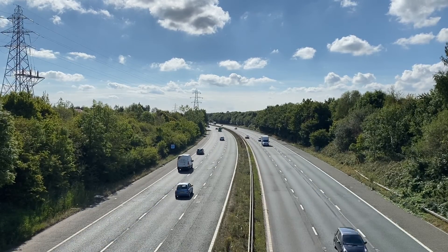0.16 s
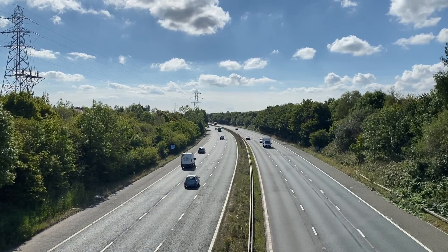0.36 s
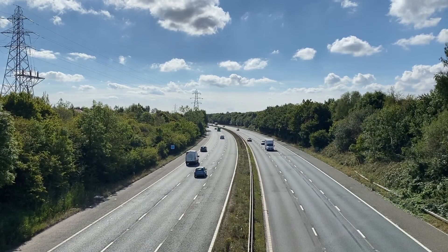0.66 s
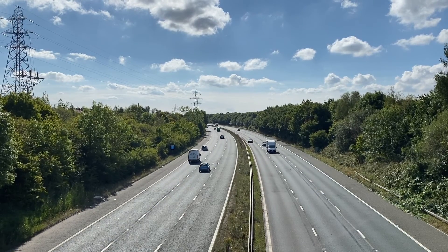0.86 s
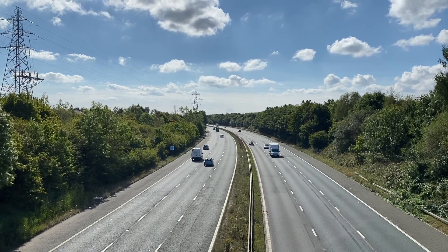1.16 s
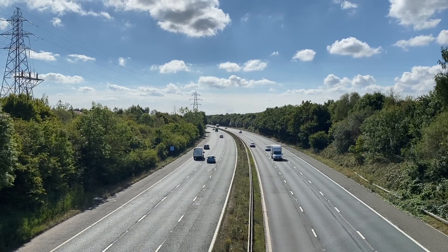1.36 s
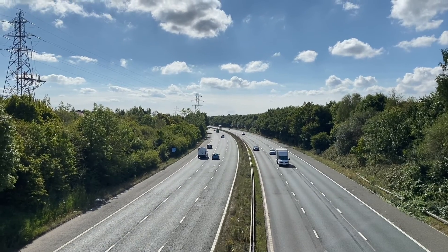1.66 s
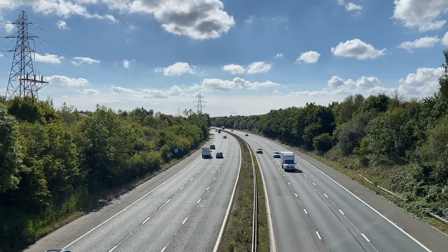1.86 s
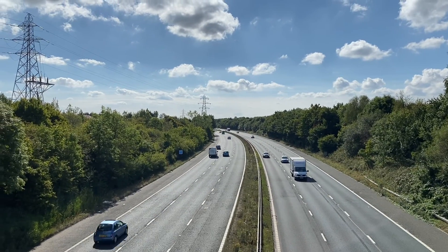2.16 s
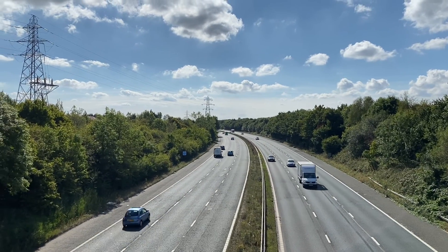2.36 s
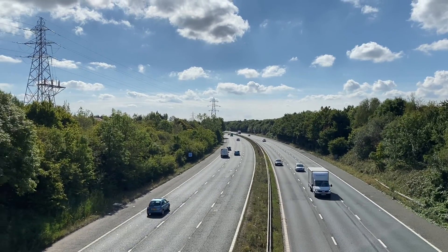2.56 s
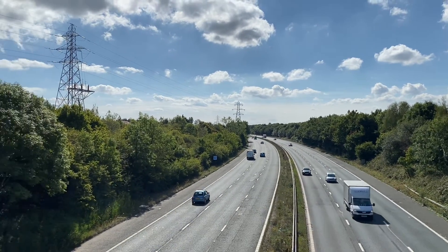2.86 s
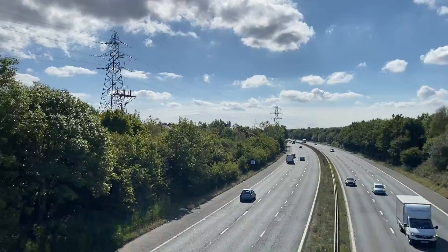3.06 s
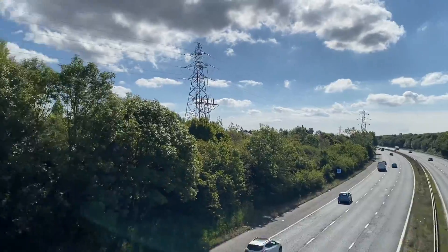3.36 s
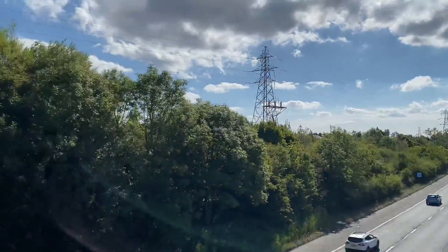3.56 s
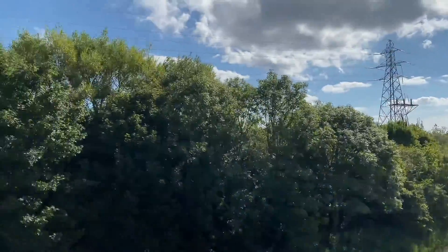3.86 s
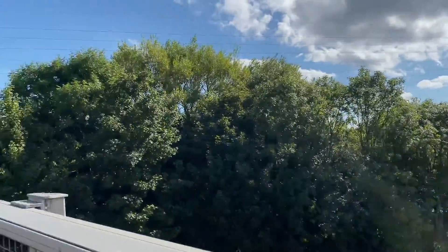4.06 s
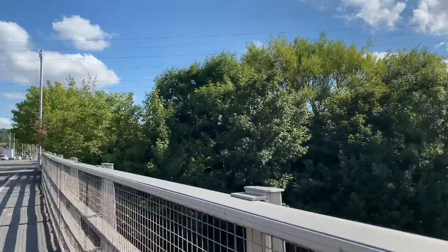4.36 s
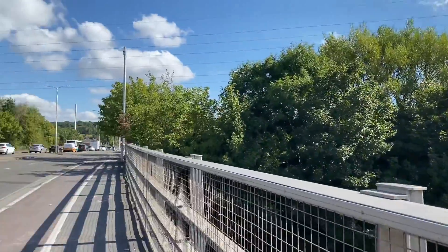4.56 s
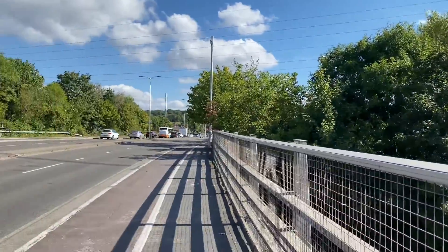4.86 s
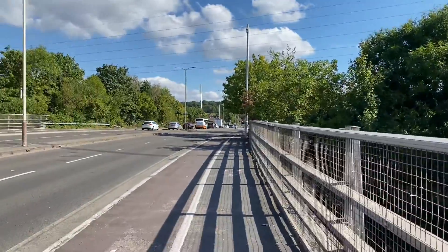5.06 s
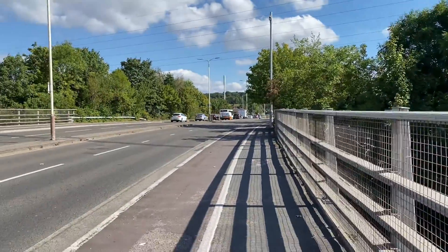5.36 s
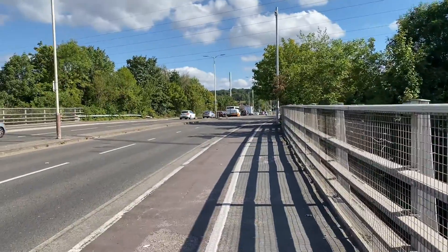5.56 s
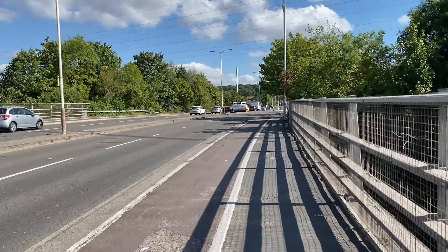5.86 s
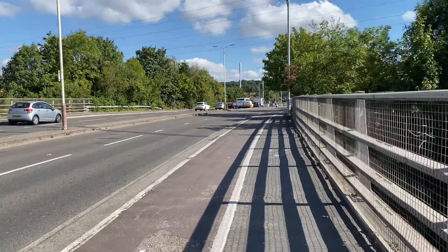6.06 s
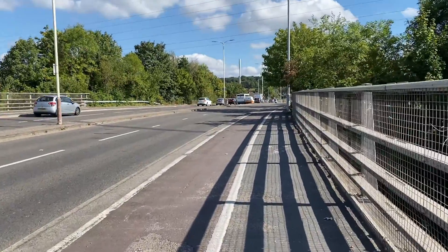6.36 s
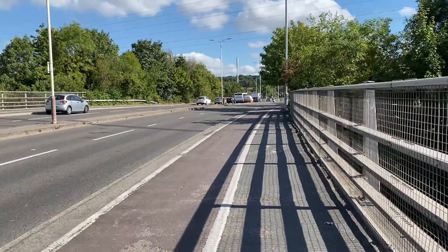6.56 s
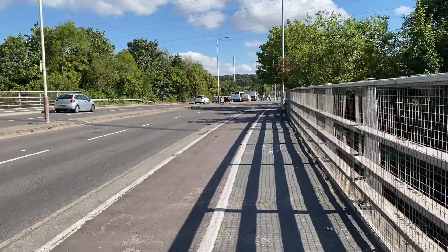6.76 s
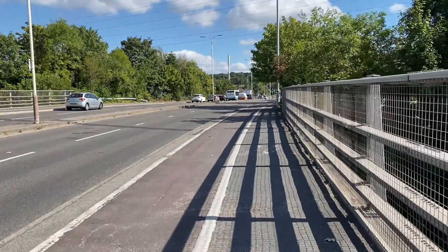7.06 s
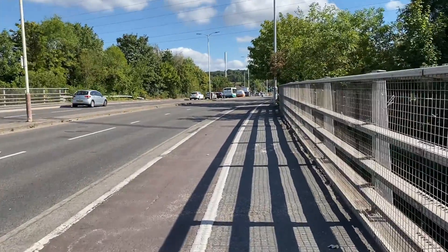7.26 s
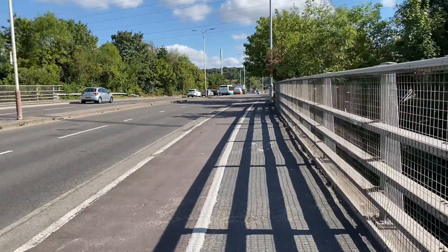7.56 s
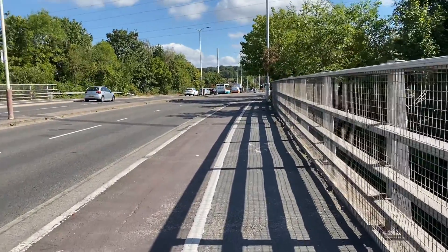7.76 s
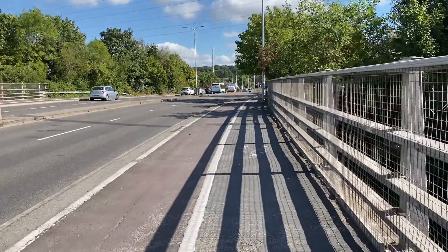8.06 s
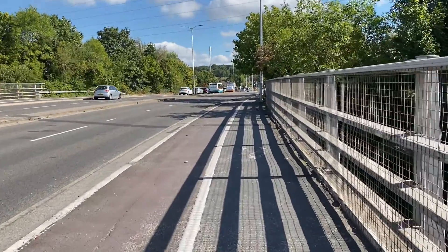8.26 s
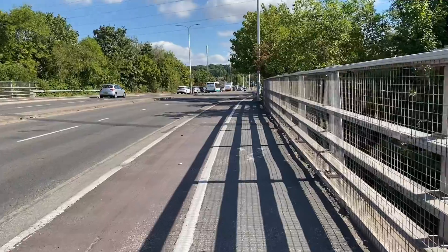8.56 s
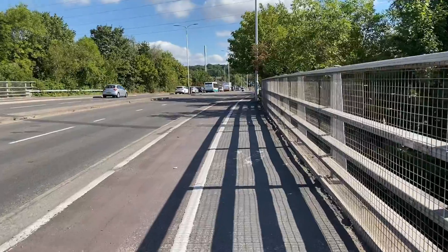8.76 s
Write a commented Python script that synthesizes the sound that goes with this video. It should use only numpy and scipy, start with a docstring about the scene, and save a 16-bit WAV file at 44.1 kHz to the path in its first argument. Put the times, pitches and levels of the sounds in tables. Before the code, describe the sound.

Fast traffic rushes under a bridge in overlapping whooshes over low engine rumble; the roar shifts rightward midway and soft wind buffets appear.

```python
"""Motorway from a bridge

On a bridge above a motorway, two microphone ports turn from the road to the deck, facing then behind the parapet.
Tyre roar is banded noise near 1 kHz that slides with each vehicle, over low-passed engine rumble and drone.
Cars burst from under the deck as sudden bright hiss; gliding bands of noise make single tyre notes.
Soft swishes and ticks are short noise bursts; a light wind thumps on the ports as brief low pulses.
"""
import sys
import numpy as np
from scipy import signal
from scipy.fft import rfft, irfft, next_fast_len
from scipy.io import wavfile
from scipy.ndimage import map_coordinates

SR = 44100
rng = np.random.default_rng(int(sys.argv[2]) if len(sys.argv) > 2 else 0)


def waveform_to_disk(signal):
    """Save audio, clipped to [-1, 1], as 16-bit WAV at the path in sys.argv[1]."""
    frames = np.transpose(np.atleast_2d(signal))
    scaled = np.clip(frames, -1, 1) * 32767
    samples = np.round(scaled).astype(np.int16)
    wavfile.write(sys.argv[1], SR, samples)


N = 393810
TIME = np.arange(N) / SR   # s
SIZE = next_fast_len(N)
HZ = np.maximum(np.arange(SIZE // 2 + 1) * SR / SIZE, 1)   # pitch of each bin; the log axis needs 1 or more

# In all that follows a positive lag means the left port hears later, a positive tilt that it hears louder.
LAG_FACING_MS, LAG_AWAY_MS = -0.35, 0.26
TILT_FACING_DB, TILT_AWAY_DB = 1.5, -8
LAG_MS_PER_DB = 0.33   # lag added with each dB of a vehicle's own tilt
BELOW_S, BELOW_LAG_MS = 0.99, 0.24   # the first cars are straight below: extra lag, halved by this time


def motorway():
    """Traffic on one bearing, which swings from ahead to the right as the ports turn."""
    swing = turning()
    levels_db, pitch_hz, side_db = traffic(swing)
    rumble_db, drone_db, roar_db, hiss_db, fizz_db = levels_db
    tilt_db = TILT_FACING_DB + swing * (TILT_AWAY_DB - TILT_FACING_DB) + side_db
    lag_ms = LAG_FACING_MS + swing * (LAG_AWAY_MS - LAG_FACING_MS) + LAG_MS_PER_DB * side_db
    lag_ms = lag_ms + BELOW_LAG_MS / (1 + (TIME / BELOW_S) ** 4)
    to_right = np.clip(lag_ms / 0.3, 0, 1)   # how far the road lies to the right
    out = tyre_roar(roar_db, pitch_hz, lag_ms, tilt_db, to_right)
    out += road_hiss(hiss_db, to_right)
    out += tyre_notes(lag_ms)
    out += emerging_cars()
    out += engine_drone(drone_db, lag_ms, tilt_db, to_right)
    out += engine_rumble(rumble_db, lag_ms, to_right)
    return out + fizz(fizz_db)


TURN_MID_S, TURN_S = 3.985, 0.49   # middle of the turn, and its time constant


def turning():
    """The ports swing smoothly from 0, facing the road, to 1, along the deck."""
    return .5 + .5 * np.tanh((TIME - TURN_MID_S) / TURN_S)


# Vehicles heard singly, with levels at their nearest [nearest_s, approach_s, departure_s,
# rumble_db, drone_db, roar_db, hiss_db, fizz_db, roar_pitch_hz (steers the roar), extra tilt_db]
VEHICLES = [(.44, 0.4, 0.16, -29, -30.5, -22.5, -32.5, -45.5, 1036, 0),
            (.75, 0.2, 0.15, -37, -27.5, -28.5, -36.5, -69, 806, 2),
            (1.4, 0.31, 0.19, -34, -32.5, -25.5, -40, -55.5, 836, -0.5),
            (1.98, 0.52, 0.49, -40.5, -32.5, -31, -36, -58, 1040, 1.5),
            (2.5, 0.13, 0.27, -44, -41, -20, -38.5, -56.5, 892, 0),
            (2.9, 0.24, 1, -34, -31, -25.5, -36.5, -63, 990, 1),
            (3.68, 0.23, 0.31, -33, -27.5, -25.5, -38, -51.5, 793, 2),
            (4.05, 0.21, 0.18, -30, -21.5, -22, -32.5, -60, 910, 1),
            (4.45, 0.5, 0.23, -26.5, -46, -26.5, -42, -72, 1080, 0.5),
            (4.95, 0.31, 0.23, -32.5, -35.5, -23.5, -38.5, -60.5, 1084, 0.5),
            (5.38, 0.18, 0.3, -36.5, -33, -31, -42.5, -72, 1024, 5),
            (6.1, 0.18, 0.25, -32.5, -40, -29.5, -50, -69, 970, 2),
            (6.8, 0.11, 0.34, -40, -36.5, -30, -45, -65, 836, 0),
            (7.25, 0.18, 0.25, -30, -32.5, -26.5, -55, -61.5, 964, 0),
            (7.82, 0.28, 0.2, -38, -42.5, -31.5, -46.5, -67, 940, 0),
            (8.55, 0.57, 0.38, -34.5, -41.5, -25.5, -51, -73.5, 950, 1.5)]
# Distant flow under them, facing the road and then behind the parapet
# [rumble_db, drone_db, roar_db, hiss_db, fizz_db]
FLOW_FACING, FLOW_AWAY = (-37, -34, -27, -43, -80), (-37, -35.5, -29.5, -42, -70.5)
FLOW_PITCH_HZ = 960
FALL_POWER = 1.474   # far off, power falls as distance to twice this power


def traffic(swing):
    """Each vehicle adds power to the flow as it nears; its share of the roar pulls pitch and side its way."""
    s, approach, departure, *levels_db, pitch_hz, side_db = np.transpose(VEHICLES)[:, :, None]
    distance = (TIME - s) / np.where(TIME < s, approach, departure)
    near = (1 + distance ** 2) ** -FALL_POWER
    flow = [from_db(2 * (a + swing * (b - a))) for a, b in zip(FLOW_FACING, FLOW_AWAY)]   # power
    single = [from_db(2 * db) * near for db in levels_db]
    total = [f + v.sum(axis=0) for f, v in zip(flow, single)]
    roar_share = single[2] / total[2]
    road_pitch_hz = FLOW_PITCH_HZ + (roar_share * (pitch_hz - FLOW_PITCH_HZ)).sum(axis=0)
    return 10 * np.log10(total), road_pitch_hz, (roar_share * side_db).sum(axis=0)


# Shape of the tyre roar [pitch_hz, relative level_db]
ROAR = [(250, -26.5), (450, -16), (650, -6), (820, -0.5), (1000, 0), (1200, -0.5), (1550, -9.5),
        (1750, -10), (2000, -26.5), (3000, -65.5)]
# How much of the roar's left-right tilt each pitch takes [pitch_hz, share 0-1]
SHADOW = [(500, 1), (1000, 0.84), (1600, 0.58)]


def tyre_roar(level_db, pitch_hz, lag_ms, tilt_db, to_right):
    """Third-octave noise bands whose gains follow the roar's shape as it slides with speed and angle."""
    white = scattered(arriving(lag_ms, .95 - 0.24 * to_right, order=1), to_right)
    spectrum, roar = rfft(white, SIZE), 0
    slide = (1000 / pitch_hz) ** 1.23   # the power widens the slide
    for hz in 315 * 2 ** (np.arange(11) / 3):
        band = np.maximum(1 - abs(3 * np.log2(HZ / hz)), 0)
        gain = from_db(at_hz(ROAR, hz * slide) + 1.5 * drift(10.0))
        tilt = sides(at_hz(SHADOW, hz) * tilt_db)
        roar = roar + gain * tilt * irfft(spectrum * band, SIZE)[:, :N]
    return from_db(level_db) * rms_one(roar)


# Share of the arriving roar not swapped for each port's own noise
# [pitch_hz, facing the road 0-1, turned away 0-1]
ROAR_LIKENESS = [(350, 0.6, 0.05), (553, 0.97, 0.4), (884, 0.78, 0.68), (1210, 0.55, 0.8), (1600, 0.55, .9),
                 (2300, 0.5, .8)]


def scattered(white, to_right):
    """Scatter swaps part of each pitch for noise of each port's own, by how far right the road lies."""
    left, right = rfft(white, SIZE)
    own = rfft(rng.standard_normal((2, N)), SIZE)
    hz, *shares = np.transpose(ROAR_LIKENESS)
    views = []
    for share, bend in zip(shares, case_turn(HZ)):
        alike = np.clip(at_hz(np.transpose([hz, share]), HZ), 0, 1)
        mixed = np.sqrt(alike) * np.array([left * bend, right]) + np.sqrt(1 - alike) * own
        views.append(irfft(mixed, SIZE)[:, :N])
    facing, away = views
    return (1 - to_right) * facing + to_right * away


# The microphone case bends the roar's path: phase the left port gains
# [pitch_hz, facing_rad, turned_away_rad]
CASE_TURN = [(500, 0, 0), (800, 0, -.3), (1000, 0, -.1), (1250, -.3, .5), (1700, .9, 1.5), (2300, 2, 1.5)]


def case_turn(hz):
    """Phase turns of the left port as the case bends the path, facing the road and turned away."""
    at, *turns = np.transpose(CASE_TURN)
    return [np.exp(1j * at_hz(np.transpose([at, turn]), hz)) for turn in turns]


# Shape of the hiss from the lanes below [pitch_hz, relative level_db]
HISS = [(1000, -2.5), (1700, 6), (2300, 2.5), (3200, -7), (4500, -15), (6000, -19), (7500, -26),
        (10000, -67.5)]


def road_hiss(level_db, to_right):
    """Patchy hiss from the lanes below: straight ahead, then arriving from the right after the turn."""
    hiss = colour(arriving(.22 * to_right, .45), HISS)
    return from_db(level_db) * sides(np.array([-1.2])) * patchy(hiss, low_hz=1500, patchy_db=2.0, rate_hz=14.0)


def patchy(x, low_hz, patchy_db, rate_hz, count=12):
    """Sixth-octave bands above a pitch each wander in level; the end bands take all beyond them."""
    spectrum, out = rfft(x, SIZE), 0
    place = np.clip(6 * np.log2(HZ / low_hz), 0, count - 1)
    for k in range(count):
        band = np.maximum(1 - abs(place - k), 0)
        out = out + from_db(patchy_db * drift(rate_hz)) * irfft(spectrum * band, SIZE)[:, :N]
    return out


# Narrow tyre notes of single vehicles that glide out of the roar
# [start_s, length_s, first pitch_hz, pitch_hz it glides towards, glide time constant_s, width_hz,
#  level_db, tilt_db]
TYRE_NOTES = [(.5, 0.69, 954, 830, 0.14, 260, -30.5, -14), (1.92, 0.12, 2180, 2050, 0.13, 300, -37, -8),
              (2.0, 0.12, 1750, 1690, 0.097, 350, -36, -8), (2.88, 0.27, 1793, 1710, .1, 400, -36, -21),
              (3.399, 1, 773, 1099, .6, 258, -28, -16), (4.4, 0.81, 1680, 1653, 0.43, 200, -37, 0),
              (4.55, 0.94, 952, 1138, 0.42, 149, -28.5, -15), (5.65, 0.44, 1593, 1605, 0.44, 180, -37, -16),
              (3.76, 0.47, 898, 1201, 0.19, 380, -25, 0), (6.75, 0.45, 2300, 2180, 0.37, 350, -49, -18),
              (6.82, 0.76, 739, 1064, .3, 190, -25.5, -10), (7.02, 1.27, 959.6, 1276, 0.16, 260, -26, -7),
              (7.38, 0.72, 1119, 862, .45, 297, -25.5, -9), (6.98, .36, 820, 1031, .14, 70, -28, -6),
              (3.85, .33, 1079, 1282, .12, 160, -26, -1), (3.98, .4, 900, 800, 0.198, 150, -26, -4)]
NOTE_RISE, NOTE_FALL = 0.23, 0.31   # shares of the length


def tyre_notes(lag_ms):
    """Narrow noise carried on a gliding pitch; the left port hears it with the road's lag."""
    out, noise = np.zeros((2, N)), rng.standard_normal(N) + 1j * rng.standard_normal(N)
    for k, (s, length, first_hz, last_hz, glide, width_hz, db, tilt_db) in enumerate(TYRE_NOTES):
        span = slice(int(s * SR), int((s + length) * SR))
        since = TIME[span] - s
        hz = last_hz + (first_hz - last_hz) * np.exp(-since / glide)
        swell = np.clip(np.minimum(since / NOTE_RISE, (length - since) / NOTE_FALL) / length, 0, 1)
        own = np.roll(noise, k * SR)[span]   # another stretch of noise for each note
        wobble = signal.sosfilt(signal.butter(3, width_hz / 2, fs=SR, output="sos"), own)
        carrier = np.exp(2j * np.pi * np.cumsum(hz) / SR)
        note = wobble * carrier * np.sqrt(2) / np.std(wobble)
        bend = case_turn(hz)[int(s > TURN_MID_S)]
        left = np.interp(since - lag_ms[span] / 1000, since, note * bend)
        out[:, span] += from_db(db) * swell * sides(np.array([tilt_db])) * np.real([left, note])
    return out


# Cars leaving the shadow of the deck [start_s, level_db, hold_s, fade_db_per_s]
EMERGE = [(0.652, -39.5, 0.02, 63), (1.928, -38.5, 0.094, 73), (2.899, -40.5, 0.06, 74)]
# Shape of the tyre hiss close below [pitch_hz, relative level_db]
NEAR_TYRES = [(800, -34), (2000, 9), (3300, 4.5), (5000, -4.5), (8000, -3), (12500, -14.5), (16000, -12)]
EDGE_BOOST, EDGE_S = 0.95, 0.017   # extra share of level at the first instant, and its decay


def emerging_cars():
    """Bright rasping hiss that jumps up in 7 ms as a car clears the deck, then holds and fades."""
    level = np.zeros(N)
    for s, db, hold, fade_db in EMERGE:
        since = TIME - s
        onset = np.clip(since / .007, 0, 1)
        edge = 1 + EDGE_BOOST * np.exp(-np.maximum(since, 0) / EDGE_S)
        level += onset * edge * from_db(db - fade_db * np.maximum(since - hold, 0))
    return level * from_db(1.3 * drift(90)) * colour(arriving(0, .25, order=0), NEAR_TYRES)


# Soft bright swishes of tyre hiss [peak_s, swell_s, pitch_hz, level_db, tilt_db]
SWISHES = [(.05, 0.25, 3800, -47.5, 1), (.45, .12, 4000, -55, 11), (2.0, 0.051, 3100, -41, -10),
           (2.97, 0.018, 3760, -45, -3), (3.04, 0.065, 4630, -54, -6), (7.17, 0.1, 5500, -58.5, 10),
           (7.2, 0.087, 3030, -61, 1), (7.9, 0.18, 3300, -53, 1)]
SWISH_OCTAVES = 0.27   # band edges either side of the pitch


def swishes():
    """A narrow, gritty band of tyre noise swells and fades."""
    out, white = np.zeros((2, N)), arriving(0, .5, order=0) * from_db(2.0 * drift(90))
    for s, swell, hz, db, tilt_db in SWISHES:
        span = slice(max(int((s - 4 * swell) * SR), 0), int((s + 4 * swell) * SR))
        edges = np.clip(hz * 2 ** (SWISH_OCTAVES * np.array([-1, 1])), 10, .45 * SR)
        band = rms_one(signal.sosfilt(signal.butter(2, edges, "band", fs=SR, output="sos"), white[:, span]))
        shape = np.exp(-.5 * ((TIME[span] - s) / swell) ** 2)
        out[:, span] += from_db(db) * shape * sides(np.array([tilt_db])) * band
    return out


# Shape of the engine drone [pitch_hz, relative level_db]
DRONE = [(100, 1), (170, -2.5), (250, 1), (380, -3.5), (550, -2.5), (900, -35), (1500, -69)]


def engine_drone(level_db, lag_ms, tilt_db, to_right):
    """Engine noise of the low middle; long waves take a wider lag and little of the road's tilt."""
    drone = colour(arriving(1.34 * lag_ms + 0.088, .93 - 0.43 * to_right, order=1), DRONE)
    return from_db(level_db + 0.47 * drift(2.3)) * sides(0.23 * tilt_db - 1.5) * drone


# Shape of the engine rumble [pitch_hz, relative level_db]
RUMBLE = [(20, -30), (32, -15), (50, 13.5), (75, 13), (110, 7.5), (160, 6), (240, -3.5), (400, -69.5)]


def engine_rumble(level_db, lag_ms, to_right):
    """Deep engine noise, nearly alike at both ports and equally loud."""
    rumble = colour(arriving(0.4 * lag_ms, .97 - 0.11 * to_right, order=1), RUMBLE)
    return from_db(level_db + 0.34 * drift(1.6)) * rumble


# Shape of the fizz [pitch_hz, relative level_db]
FIZZ_COLOUR = [(2000, -10), (3500, 8), (7200, 2), (10500, -2), (12800, -8), (16000, -8)]


def fizz(level_db):
    """The finest treble noise, drawn apart for each side, that follows the traffic."""
    return from_db(level_db + 1.2 * drift(10)) * colour(rng.standard_normal((2, N)), FIZZ_COLOUR)


# Faint bright ticks [start_s, level_db before the fade, thinness 0-1]
TICKS = [(2.4194, -48, .9), (4.868, -44, 0.2), (6.1694, -60, .5), (6.782, -49, 0.2), (6.796, -53, 0.2),
         (7.2681, -52, .8), (7.573, -49, .2), (7.590, -48, .4), (7.599, -47, .4), (8.5899, -49, 0.3)]
TICK_RISE_S, TICK_FADE_DB_PER_S = .001, 900


def ticks():
    """Short soft bursts of bright noise, one noise for both sides, some thinner than others."""
    out, white = np.zeros((2, N)), rng.standard_normal(N)
    crisp = colour(white, [(1500, -19), (4000, 13.5), (9000, 1.5), (15000, -20)])
    thin = colour(white, [(6000, -30), (10000, -7), (15000, 12)])
    for s, db, thinness in TICKS:
        span = slice(int(s * SR), int((s + .15) * SR))
        since = np.maximum(TIME[span] - s, 0)
        level = np.minimum(since / TICK_RISE_S, 1) * from_db(db - TICK_FADE_DB_PER_S * since)
        out[:, span] += level * ((1 - thinness) * crisp[span] + thinness * thin[span])
    return out


# Wind thumps on the ports [time_s (13 ms before the peak), peak level_db, nominal pitch_hz]
THUMPS = [(4.381, -19, 76), (4.525, -21, 88), (5.435, -18.5, 69), (6.138, -24, 75.9), (6.232, -21.5, 67),
          (7.276, -14, 201), (7.291, -26, 91), (7.363, -19.5, 85), (7.474, -19, 129), (7.529, -25, 73.5),
          (8.413, -17.5, 129)]


def wind_thumps():
    """Each eddy pushes the ports for a cycle or two, its pitch highest at the peak and sagging after."""
    out = np.zeros((2, N))
    for s, db, hz in THUMPS:
        span = slice(int((s - .05) * SR), int((s + .15) * SR))
        cycles = hz * (TIME[span] - s - .013)
        spread = np.where(cycles < 0, .7, 1.7)   # quick rise, slower fall
        turns = np.tanh(0.37 * cycles) / 0.34
        out[:, span] += from_db(db) * np.exp(-(cycles / spread) ** 2) * np.cos(2 * np.pi * turns)
    return out


def arriving(lag_ms, alike, order=3):
    """White noise at two ports: a direct part with a lag between them, and a scattered part of their own."""
    alike, direct = np.clip(alike, 0, 1), rng.standard_normal(N)
    half = lag_ms * SR / 2000   # samples; each port takes half the lag
    pair = [map_coordinates(direct, [np.arange(N) + side * half], order=order, mode="mirror")
            for side in (-1, 1)]
    return np.sqrt(alike) * rms_one(np.array(pair)) + np.sqrt(1 - alike) * rng.standard_normal((2, N))


def sides(tilt_db):
    """Left and right gains of a left-right tilt, power kept."""
    g = from_db(tilt_db)
    return np.sqrt(2 / (1 + g * g)) * np.array([g, np.ones_like(g)])


def drift(rate_hz):
    """Slow chance with spread 1: noise through two equal low-pass poles, made at every 40th sample."""
    r = np.exp(-80 * np.pi * rate_hz / SR)
    slow = signal.lfilter([1], [1, -2 * r, r * r], rng.standard_normal(N // 40 + 2002))
    slow = slow[2000:]   # skip the filter's start
    return np.interp(np.arange(N) / 40, np.arange(len(slow)), rms_one(slow))


def colour(x, spectrum):
    """Filtered to a spectrum; rms 1."""
    return rms_one(irfft(rfft(x, SIZE) * from_db(at_hz(spectrum, HZ)), SIZE)[..., :N])


def at_hz(points, hz):
    """A spectrum read on a log axis, flat beyond its ends."""
    return np.interp(np.log(hz), np.log(np.array(points)[:, 0]), np.array(points)[:, 1])


def rms_one(x):
    """Scaled to rms 1."""
    return x / np.sqrt(np.mean(x ** 2) + 1e-20)


def from_db(db):
    """Gain of a level in dB."""
    return 10 ** (np.asarray(db) / 20)


def scene():
    """All sources at the two ports."""
    return motorway() + swishes() + ticks() + wind_thumps()


TREBLE_LAG_MS, TREBLE_TURN_CYCLES = 0.2804, 0.2   # lag and phase turn chosen for the right channel's top treble
TOP_HZ, TOP_LIKENESS = 7820, .78   # middle of the crossover, and the shared part of power above it


def top_treble(x):
    """Above the crossover both channels mostly share one noise, alike and opposed in turn with pitch."""
    left, right = rfft(x, SIZE)
    top = TOP_LIKENESS * np.clip((HZ - TOP_HZ) / 600 + .5, 0, 1)
    shared = left * np.exp(-2j * np.pi * (HZ * TREBLE_LAG_MS / 1000 + TREBLE_TURN_CYCLES))
    return irfft([left, np.sqrt(1 - top) * right + np.sqrt(top) * shared], SIZE)[:, :N]


# Resonance of the left microphone port [pitch_hz, width_hz, level_db]
LEFT_PORT = (4550, 2700, 2.5)
MIC_LOW_CUT_HZ, CUTOFF_HZ = 50, 16200


def record(dry):
    """The left port has a broad treble resonance; the lowest bass and the top are cut."""
    hz, width_hz, db = LEFT_PORT
    lift = signal.lfilter(*signal.iirpeak(hz, hz / width_hz, fs=SR), dry[0])
    wet = top_treble(np.array([dry[0] + (from_db(db) - 1) * lift, dry[1]]))
    wet = signal.sosfilt(signal.butter(3, MIC_LOW_CUT_HZ, "high", fs=SR, output="sos"), wet)
    return signal.sosfilt(signal.cheby2(16, 60, CUTOFF_HZ, fs=SR, output="sos"), wet)   # 60 dB down at the cutoff


dry = scene()
out = record(dry)
waveform_to_disk(out)
```